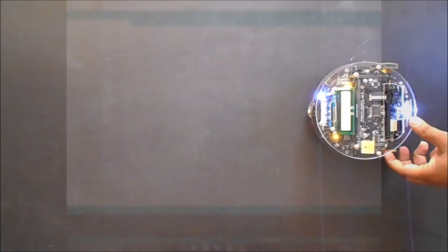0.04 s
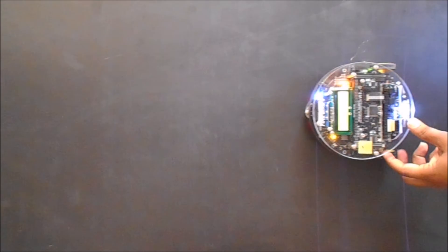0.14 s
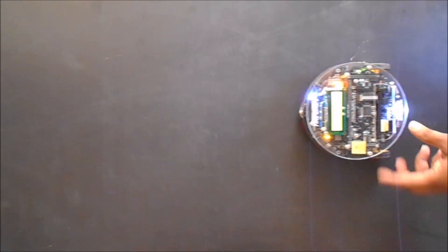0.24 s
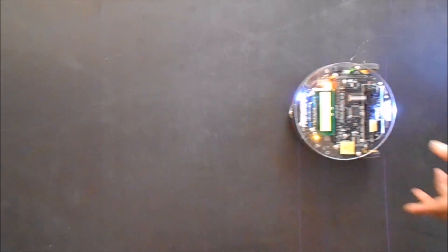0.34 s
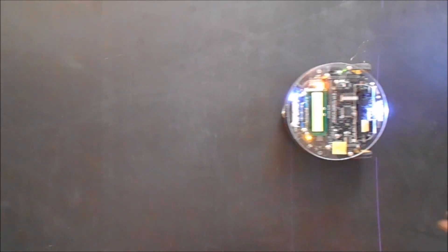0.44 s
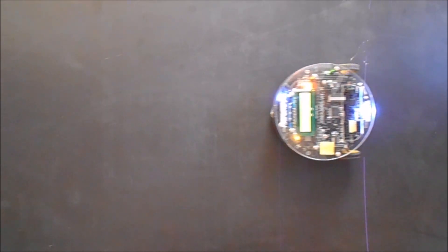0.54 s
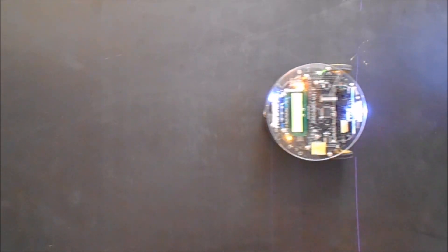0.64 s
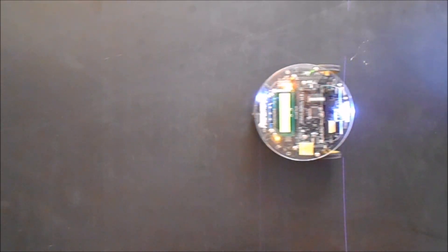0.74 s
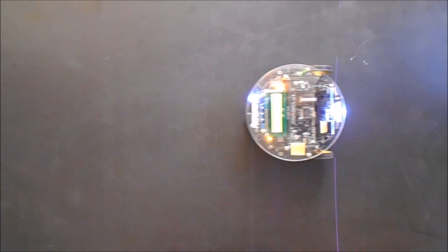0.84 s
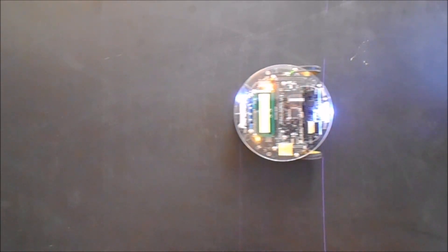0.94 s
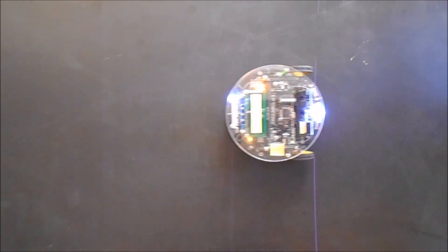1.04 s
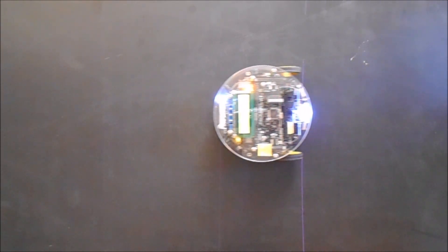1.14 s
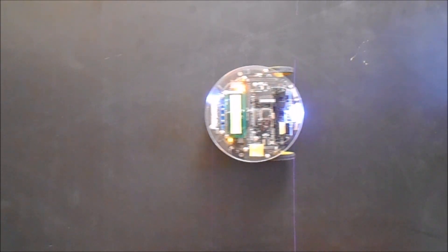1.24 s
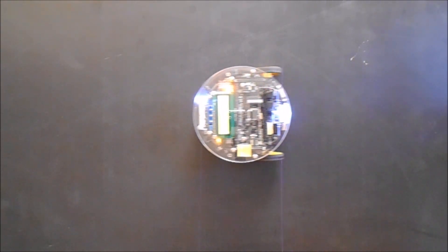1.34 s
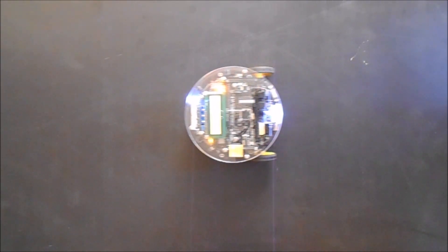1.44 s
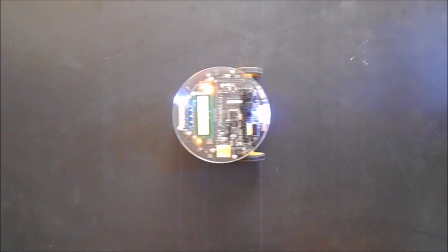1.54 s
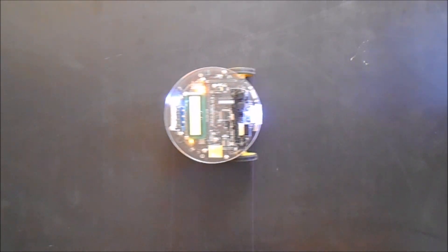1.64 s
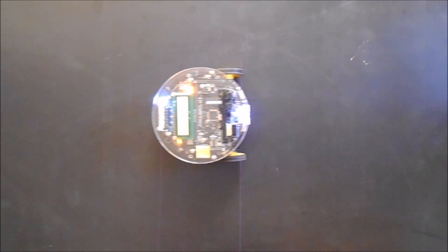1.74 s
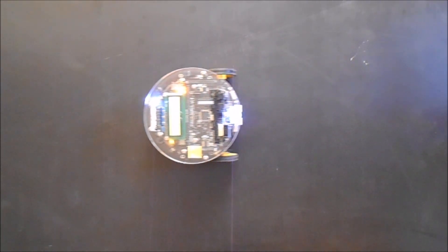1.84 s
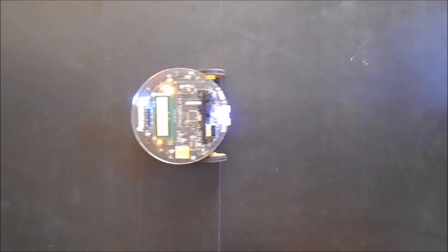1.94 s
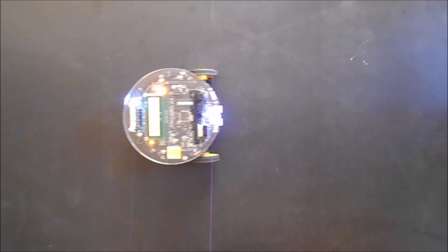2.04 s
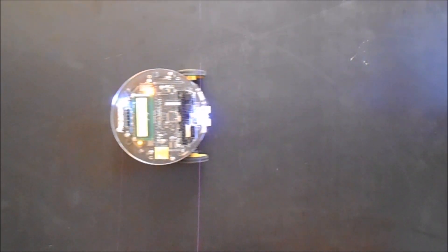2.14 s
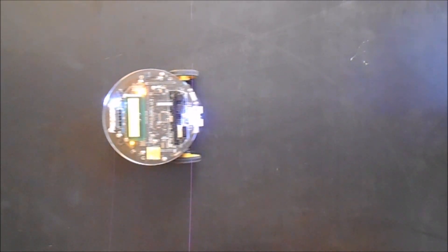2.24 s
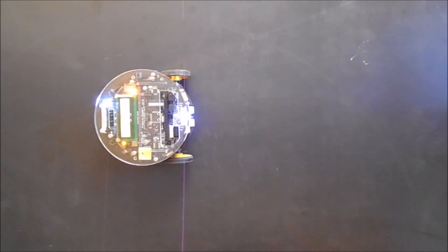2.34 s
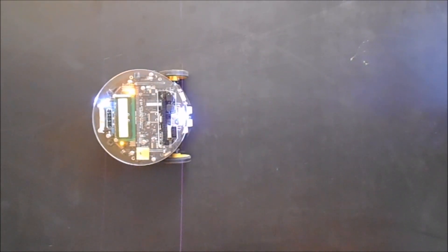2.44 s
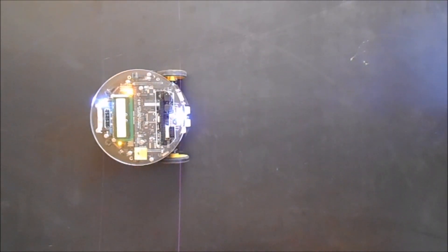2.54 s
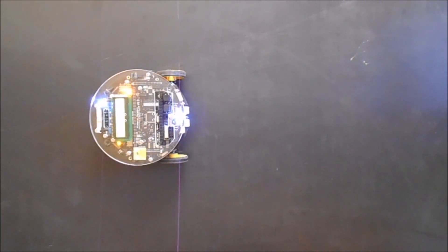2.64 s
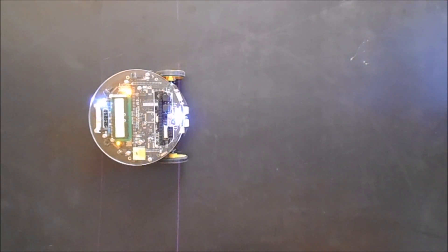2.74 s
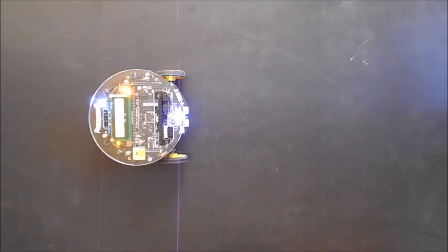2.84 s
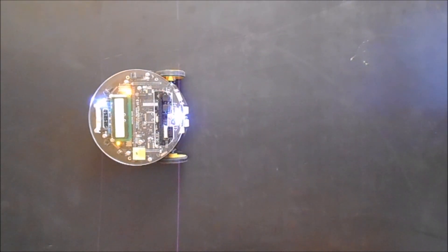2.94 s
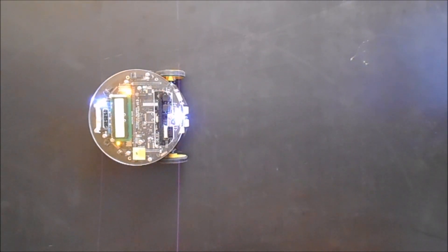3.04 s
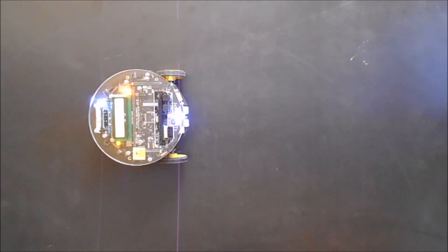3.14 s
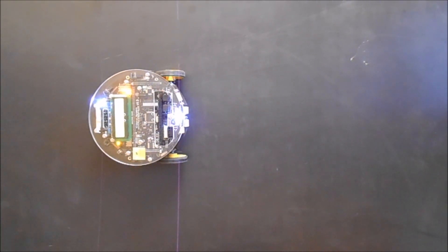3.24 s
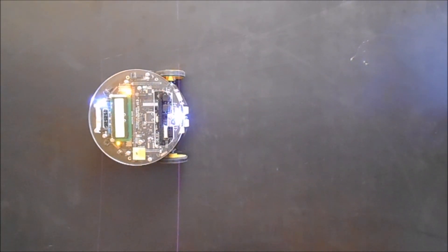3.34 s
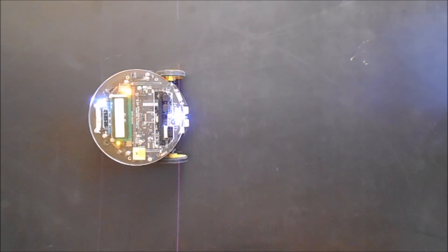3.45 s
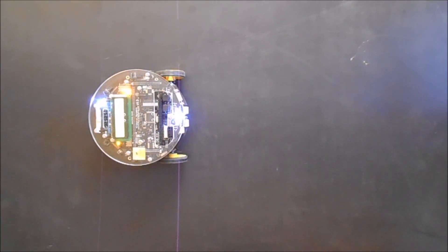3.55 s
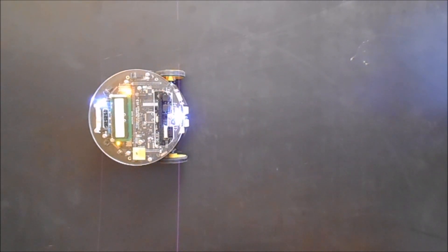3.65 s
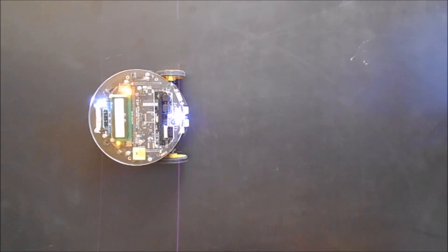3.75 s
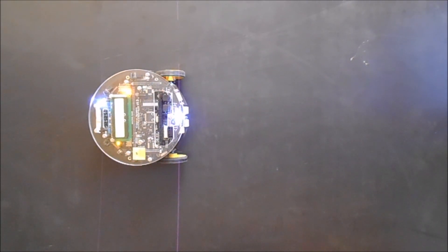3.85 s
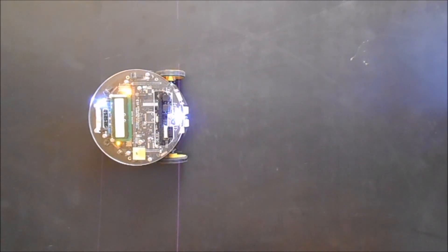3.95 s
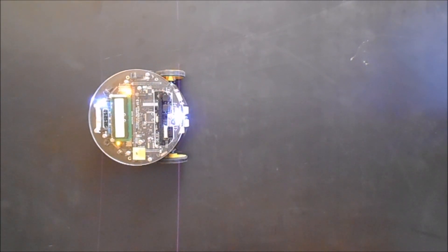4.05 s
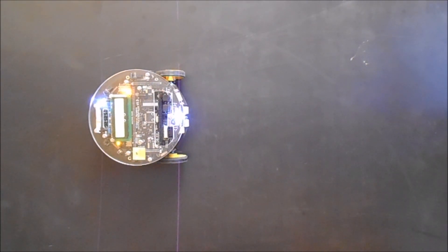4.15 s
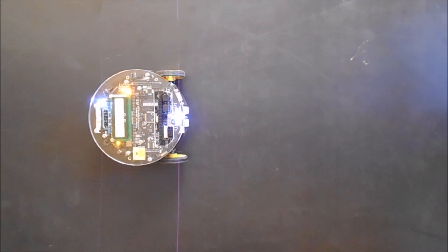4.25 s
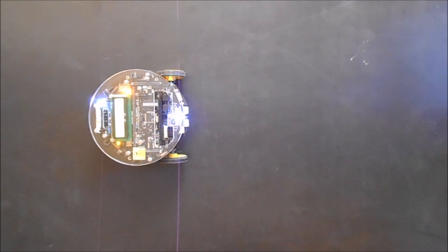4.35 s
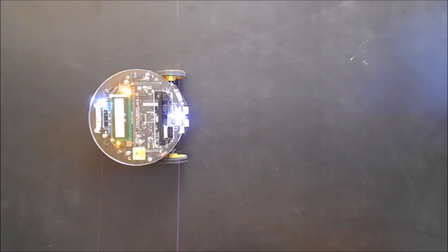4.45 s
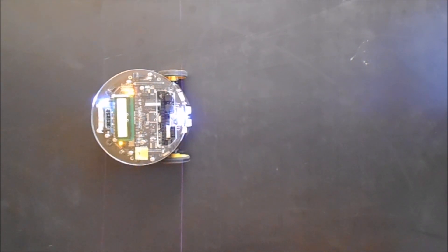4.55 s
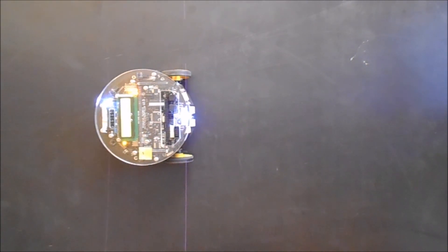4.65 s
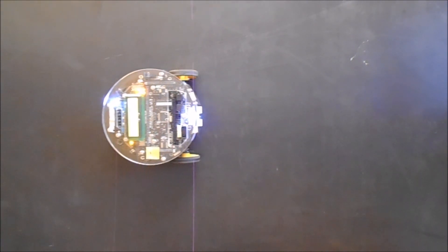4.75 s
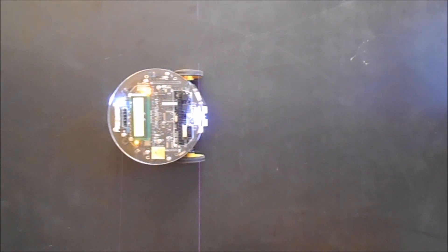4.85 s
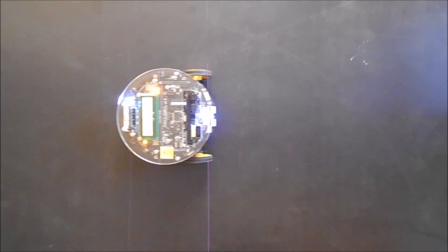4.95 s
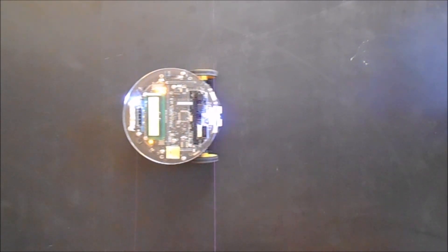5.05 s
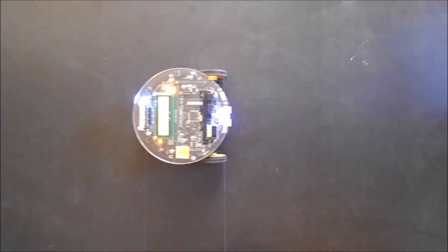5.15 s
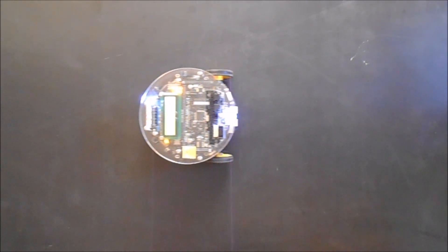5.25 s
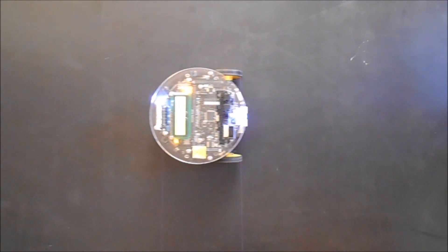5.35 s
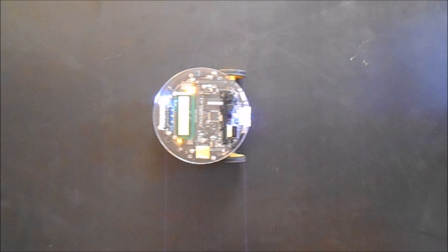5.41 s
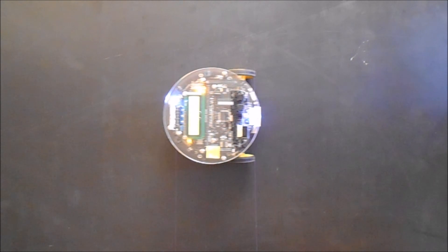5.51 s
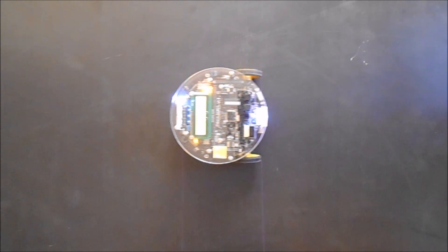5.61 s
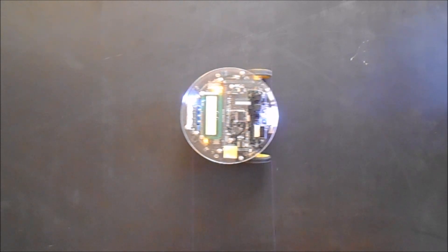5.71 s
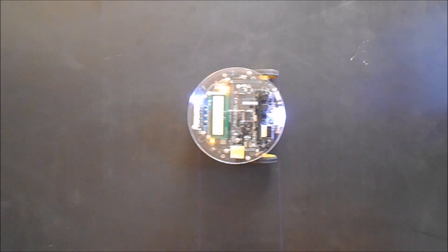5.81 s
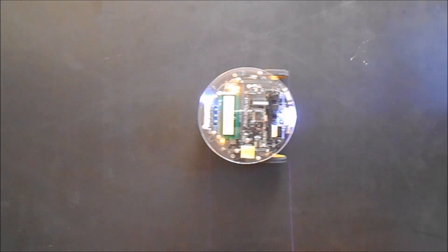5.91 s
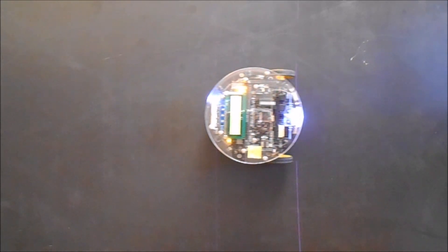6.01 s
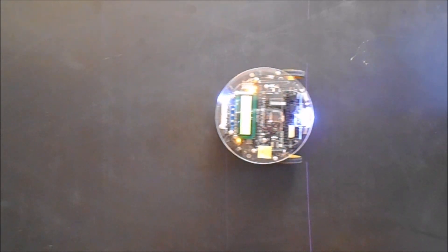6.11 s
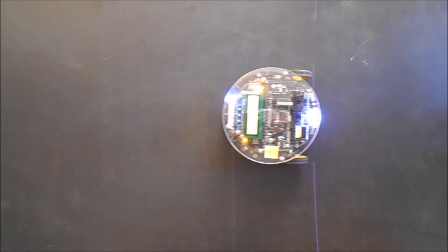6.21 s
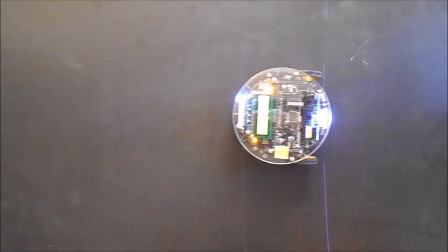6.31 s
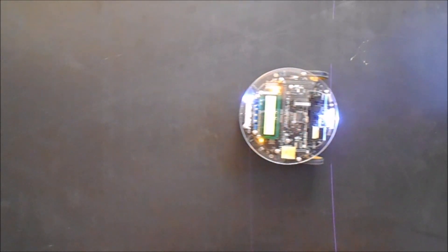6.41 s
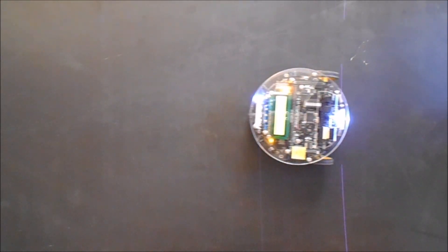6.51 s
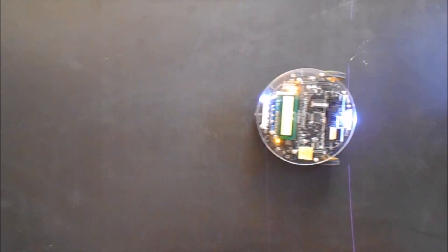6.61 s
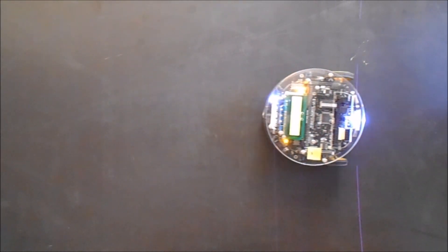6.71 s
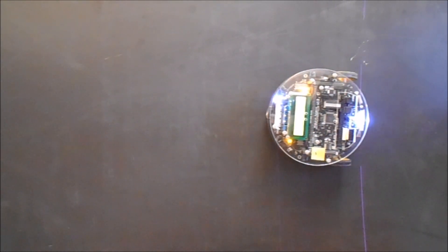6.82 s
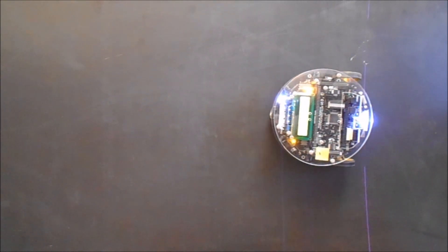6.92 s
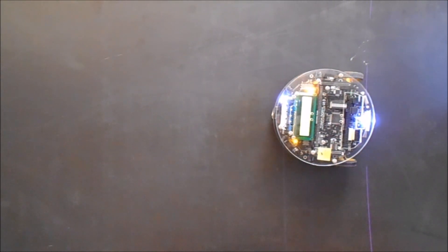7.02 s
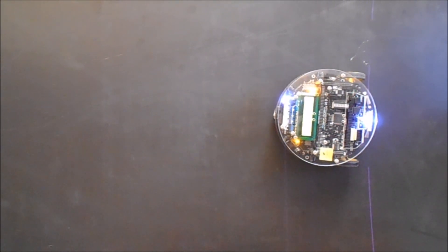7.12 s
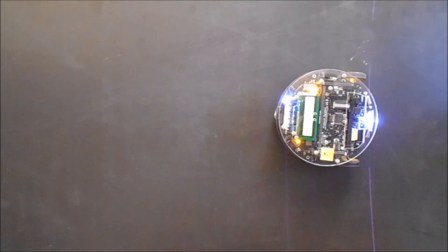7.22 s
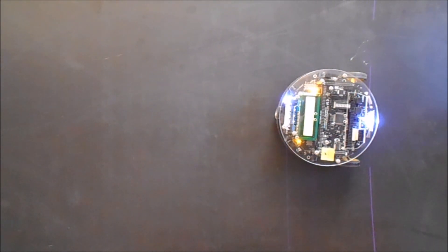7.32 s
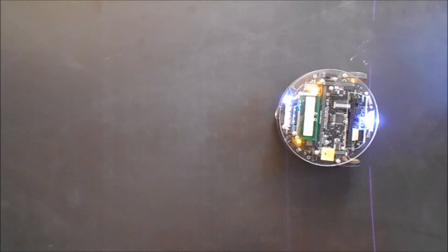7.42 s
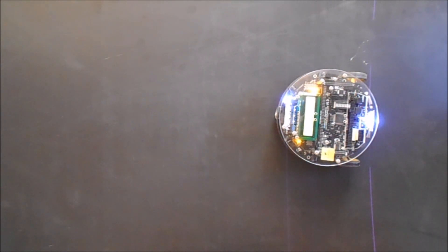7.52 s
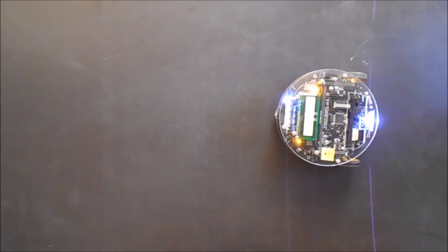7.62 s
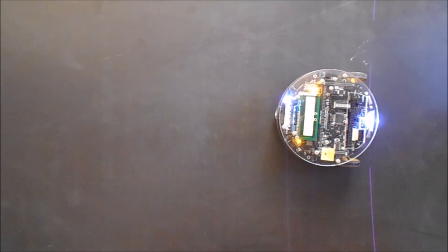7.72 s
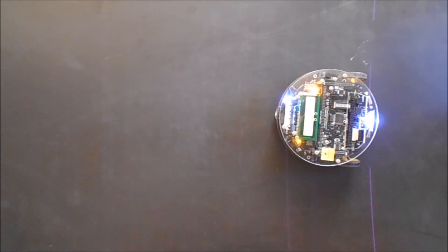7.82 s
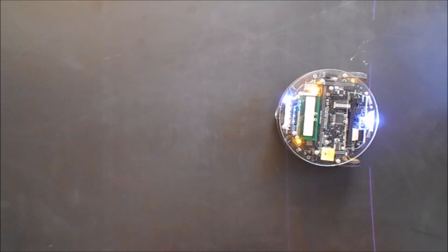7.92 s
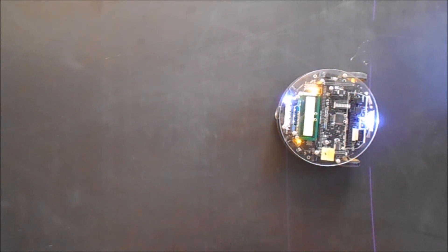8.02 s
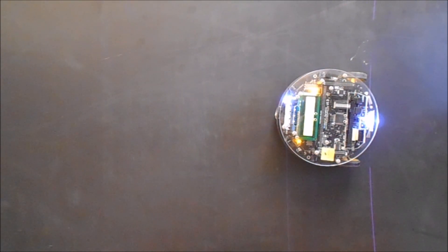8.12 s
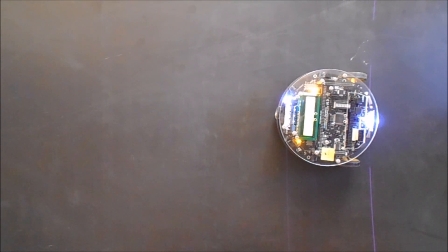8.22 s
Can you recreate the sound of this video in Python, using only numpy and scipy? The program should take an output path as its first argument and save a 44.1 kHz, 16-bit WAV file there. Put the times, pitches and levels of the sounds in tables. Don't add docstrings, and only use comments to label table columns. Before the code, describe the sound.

A switch snaps, then a small wheeled robot whirs away with a gritty gear rattle, rests, and whirs back across a hard floor.

```python
import sys
import numpy as np
from scipy import signal
from scipy.fft import rfft, irfft
from scipy.io import wavfile
from scipy.ndimage import uniform_filter1d

SR = 44100
rng = np.random.default_rng(int(sys.argv[2]) if len(sys.argv) > 2 else 0)


def boost(x):
    u = np.asarray(x, float) / 20
    return 10 ** u


def bounce(signal):
    frames = np.transpose(np.atleast_2d(signal))
    limited = np.clip(frames, -1, 1)
    pcm = np.round(limited * 32767).astype(np.int16)
    wavfile.write(sys.argv[1], SR, pcm)


N = 364707
T = np.arange(N) / SR
BACK_START_S = 4.6


def unit(x):
    return x / np.sqrt(np.mean(x ** 2))


def ring(x, hz, width_hz):
    return signal.lfilter(*signal.iirpeak(hz, hz / width_hz, SR), x)


def walk(rate_hz):
    hold_ms = int(1000 / rate_hz)
    held = np.repeat(rng.standard_normal(int(N / SR * rate_hz * 1.1) + 2), hold_ms)
    smooth = uniform_filter1d(uniform_filter1d(held, hold_ms), hold_ms)
    return 1.3 * np.interp(T * 1000, np.arange(len(held)), smooth)


def after(start_s, fall_s):
    return (T > start_s) * np.exp(-np.maximum(T - start_s, 0) / fall_s)


def teeth(scatter_db, rotor_hz, rotor_depth, gear_hz, gear_db, bump_db):
    impact_db = scatter_db * np.repeat(rng.exponential(size=N // 16 + 1), 16)[:N]
    rotor_speed = rotor_hz * (1 + 0.034 * walk(3))
    rotor_turn = np.cos(2 * np.pi * np.cumsum(rotor_speed) / SR)
    gear_speed = gear_hz * (1 + 0.08 * walk(2.0))
    gear_turn = np.cos(2 * np.pi * np.cumsum(gear_speed) / SR)
    press = (1 + rotor_depth * rotor_turn) * boost(gear_db * gear_turn + bump_db * walk(40))
    return boost(impact_db) * press


# (time [s], share of the way [0 to 1])
PLACES = [
    (.22, 0),
    (2.42, 1),
    (4.6, 1),
    (6.95, .16),
]


def body(force, modes, beams, flicker_db):
    out, power = 0, 0
    way = np.interp(T, *np.transpose(PLACES))
    back = T > BACK_START_S - 1
    for (hz, width_hz), (place, db, loss_db, back_db) in zip(modes, beams):
        share = boost(db - loss_db * abs(way - place) + back_db * back) * np.sqrt(width_hz)
        struck = force * rng.standard_normal(N)
        for _ in range(2):
            struck = ring(struck, hz, 1.5 * width_hz)
        out = out + share * boost(flicker_db * walk(12)) * unit(struck)
        power = power + share ** 2
    return out / np.sqrt(power)


# (time [s], whirr level [dB])
DRIVES = [
    [(.18, -54), (.215, -53.5), (.235, -42), (1.75, -37.5), (2.33, -37.5), (2.4, -48.5), (2.46, -49.5),
     (2.62, -60.5), (2.8, -74)],
    [(4.5, -77), (4.57, -60), (4.62, -47), (4.8, -40), (6.1, -37), (6.68, -39.5), (6.76, -44), (7.1, -56),
     (7.27, -74)],
]
# (time [s], level [dB])
GROWL_SURGES = [
    (.19, 5),
    (2.36, -2.5),
    (4.53, 5),
    (6.7, 0.5),
]


def levels():
    cruise_db, growl_slope, back_db = -41, 0.49, -2
    surge_fall_s = 0.52
    effort_db = np.maximum(*(np.interp(T, *np.transpose(run), -200, -200) for run in DRIVES))
    growl_db = -47.5 + growl_slope * (effort_db - cruise_db) + back_db * (T > BACK_START_S)
    for start_s, db in GROWL_SURGES:
        growl_db = growl_db + db * after(start_s, surge_fall_s)
    settle_t60_s = 1.2
    settle = boost(-54) * after(7.3, settle_t60_s / np.log(1000))
    return boost(growl_db) + settle, boost(effort_db)


# (pitch [Hz], width [Hz])
CHASSIS_MODES = [(945, 30), (1130, 18), (1320, 18), (1540, 130), (1930, 110), (2255, 45), (2320, 200),
                 (3020, 140), (2100, 2400)]
# (share of the way [0 to 1], level there [dB], loss over the whole way [dB], added in reverse [dB])
CHASSIS_BEAMS = [(0.7, -5, 28, 6), (.9, 0, 23, -12), (0.51, 3.5, 15, -2.5), (.85, -4.5, 6.5, 3.5),
                 (.55, -5, 2.5, 1.5), (0.21, 3.5, 16, -1.5), (.76, -23, -29.5, -.7), (.8, -7, 8, 5),
                 (.71, -11, -2.5, 0.26)]
# (pitch [Hz], width [Hz])
BOARD_MODES = [(4780, 170), (5420, 110), (5650, 120), (6320, 180), (7030, 150), (7340, 80), (7760, 130),
               (8490, 130), (9270, 250), (9700, 380), (10200, 350), (7600, 5600)]
# (share of the way [0 to 1], level there [dB], loss over the whole way [dB], added in reverse [dB])
BOARD_BEAMS = [(0.42, -12, -17, 2.5), (0.31, -21, -31, 7), (0.3, -18.5, -26, -1), (.55, -2, 33, 3.5),
               (0.043, -1, 14.5, .7), (0.31, -13, 29, -17), (.33, 2.5, 34, 2.5), (.42, -5.5, 18, 7.5),
               (.5, -9.5, -18.5, 1.5), (.75, 5, 14.5, -4), (0.73, -10.5, -13.5, -8), (.66, -8, -5.5, 0.5)]


def motors():
    growl = body(teeth(1.4, 1130, 0.23, 24, 1.0, 1.1), CHASSIS_MODES, CHASSIS_BEAMS, 0.85)
    growl = signal.sosfilt(signal.butter(2, (900, 3600), "band", fs=SR, output="sos"), growl)
    whirr = body(teeth(1.6, 305, 0.1, 30, 1.2, 0.44), BOARD_MODES, BOARD_BEAMS, 0.95)
    whirr = signal.sosfilt(signal.butter(4, 4100, "high", fs=SR, output="sos"), whirr)
    growl_gain, whirr_gain = levels()
    return growl_gain * growl + whirr_gain * whirr


def burst(t60_s):
    t = T[:2000]
    attack = np.minimum(t / 0.0006, 1)
    return rng.standard_normal(len(t)) * attack * boost(-60 * t / t60_s) / 2


# (time [s], peak level [dB], level of the duller part [dB])
GEAR_KNOCKS = [(.2885, -30, -20), (2.3274, -29, -20), (2.3695, -33, -18), (2.4191, -24.5, -22),
               (2.4348, -32, -14), (4.5154, -43, -8), (4.5207, -35, -4), (4.5368, -34, -18),
               (4.5424, -25.5, -14), (4.585, -37, -10), (4.6084, -36, -12), (4.677, -32, -12),
               (4.728, -30, -10), (4.776, -27, -14)]


def knocks():
    out = np.zeros(N)
    for start_s, db, dull_db in GEAR_KNOCKS:
        crack = burst(0.022)
        sound = ring(crack, 9750, 2300) + ring(crack, 7350, 2000)
        sound = sound + boost(dull_db) * ring(crack, 3200, 2500)
        out[int(start_s * SR):][:len(sound)] += boost(db) * sound / abs(sound).max()
    return out


# (time [s], peak level [dB])
SWITCH_SNAP = [
    (.0933, -17.5),
]
# (pitch [Hz], width [Hz], level [dB])
SHELL_MODES = [(2500, 600, -13), (3150, 600, -10), (4350, 1000, 0), (7000, 1300, -1), (9400, 1600, -4)]


def switch():
    out, crack = np.zeros(N), burst(0.017)
    (start_s, db), = SWITCH_SNAP
    for hz, width_hz, mode_db in SHELL_MODES:
        sound = unit(ring(ring(crack, hz, width_hz), hz, width_hz))
        mode_s = start_s + 3 / hz
        out[int(mode_s * SR):][:len(sound)] += boost(mode_db) * sound
    return boost(db) * out / abs(out).max()


def room(x, t60_s, gap_s, size):
    t, out = T[:SR // 3], np.zeros(N + SR)
    fade = np.sin(np.pi * np.arange(2 * size) / (2 * size))
    padded = np.pad(x, (size, 2 * size))
    for at in range(0, N, size):
        tail = rng.standard_normal(len(t)) * boost(-60 * t / t60_s) * (t > gap_s)
        tail = tail / np.sqrt(np.sum(tail ** 2))
        echo = signal.fftconvolve(padded[at:at + 2 * size] * fade, tail)
        out[at:at + len(echo)] += echo
    return out[size:size + N]


# (pitch [Hz], level per Hz [dB])
AIR_COLOUR = [(12, -58), (20, -11.5), (125, -17), (440, -11.5), (620, -5.5), (1400, -5), (2230, -12),
              (10100, -22.5)]
# (pitch [Hz], width [Hz], level [dB])
AIR_TONES = [(154.5, 10, -82.5), (244, 80, -78.5), (310.9, 4, -77), (857, 18, -68.5), (936.2, 16, -67.5),
             (1580, 230, -64.5), (1882, 80, -67), (2370, 250, -69), (3518, 36, -72), (9300, 260, -78.5),
             (11100, 1200, -86)]


def air():
    colour_hz, colour_db = np.transpose(AIR_COLOUR)
    hz = np.fft.rfftfreq(N, 1 / SR)
    colour = boost(np.interp(np.log(np.clip(hz, 1, 9900)), np.log(colour_hz), colour_db))
    dip_hz, dip_width_hz, dip_db = 1264, 90, -4
    colour = colour * boost(dip_db * np.exp(-((hz - dip_hz) / dip_width_hz) ** 2))
    hiss = unit(irfft(rfft(rng.standard_normal(N)) * colour, N))
    out = hiss * boost(-56.5 + 0.61 * walk(5))
    for tone_hz, width_hz, db in AIR_TONES:
        waver = boost(db + 1.6 * walk(4))
        out = out + waver * unit(ring(rng.standard_normal(N), tone_hz, width_hz))
    return out


def scene():
    hits, drive = knocks() + switch(), motors()
    drive_echo = boost(-7.5) * room(drive, 0.21, 0.003, size=9000)
    hits_echo = boost(-5.0) * room(hits, 0.5, 0.0074, size=9000)
    air_fade = boost(np.interp(T, (0, 0.3), (-3.5, 0)))
    mono = drive + hits + drive_echo + hits_echo + air() * air_fade
    return np.array([mono, mono])


# (time [s], frames in a row [count], step over the frame level [dB])
LONG_STALLS = [(.971, 2, 8), (3.04, 2, 9.5), (3.403, 2, 9), (3.83, 2, 6.5), (5.707, 2, 5.5),
               (5.856, 3, 6.5)]
# (time [s], frames [count], step over the frame level [dB])
SHORT_SLIPS = [(1.035, 1, 10), (1.142, 1, 10), (1.485, 1, 6), (1.72, 1, 5), (2.509, 1, 6.5),
               (2.743, 1, 5.5), (2.872, 1, 3.5), (3.233, 4, 4), (3.661, 1, 3), (3.915, 1, 4), (4.065, 1, 3),
               (4.3, 1, 4), (4.407, 2, 3.5), (4.705, 1, 8), (5.005, 2, 6), (5.175, 1, 7.5), (5.283, 1, 4),
               (5.452, 1, 4.5), (5.518, 1, 9), (5.622, 1, 5.5), (6.329, 3, 4), (6.668, 1, 4.5),
               (7.031, 2, 7), (7.224, 1, 4), (7.33, 1, 5.5), (7.523, 1, 4), (7.841, 2, 3.5),
               (8.246, 1, 3.5)]


def starve(x):
    frame_s, first_s = 1024 / 48000, 0.011
    hop = round(frame_s * SR)
    n = np.arange(2 * hop) + 0.5
    tones = np.cos(np.pi / hop * np.outer(np.arange(hop) + 0.5, n + hop / 2))
    basis = np.sin(np.pi * n / (2 * hop)) * tones
    starved = []
    for rows, gap in ((LONG_STALLS, 1), (SHORT_SLIPS, 2)):
        for start_s, count, step_db in rows:
            starved += [(start_s + k * gap * frame_s, step_db) for k in range(round(count))]
    out, last, at = np.append(x, np.zeros(hop)), 0, 0
    source = out.copy()
    for start_s, step_db in sorted(starved):
        frame = round((start_s - first_s) / frame_s)
        if frame == last + 1:
            at = at + hop
        else:
            at = int((first_s + frame * frame_s) * SR) - hop
        last, lines = frame, basis @ source[at:at + 2 * hop]
        band_db = 2.7 * np.repeat(rng.standard_normal(hop // 16 + 1), 16)[:hop]
        step = boost(step_db + 6.0 + band_db) * np.sqrt(2 * np.mean(lines ** 2))
        count = np.floor(abs(lines / step) ** 0.75 + 0.4054)
        kept = np.sign(lines) * step * count ** (4 / 3)
        out[at:at + 2 * hop] += 2 / hop * (kept - lines) @ basis
    return out[:N]


def band_limit(x):
    return signal.sosfilt(signal.butter(12, 15680, fs=SR, output="sos"), x)


def record(dry):
    hz = np.fft.rfftfreq(N, 1 / SR)
    edge_db = -32 * np.clip((hz - 10050) / 950, 0, 9) ** 2.38 - 30 * (hz > SR / 4)
    x = starve(irfft(rfft(dry[0]) * boost(edge_db), N))
    x = np.where((T > 7.2762) & (T < 7.3088), boost(-31) * x, x)
    opening = np.clip((0.2008 - T) / 0.0015, 0, 1)
    hiss = boost(-68) * rng.standard_normal(N) + boost(-81) * rng.standard_normal((2, N))
    offsets = np.array([[-0.0044], [-0.0074]])
    dither = boost(-103) * unit(ring(rng.standard_normal(N), 14500, 5000))
    dither = dither * (uniform_filter1d(x ** 2, 2048) < boost(-52) ** 2)
    mix = x + dither + opening * (offsets + hiss)
    return band_limit(mix)


dry = scene()
out = record(dry)
bounce(out)
```